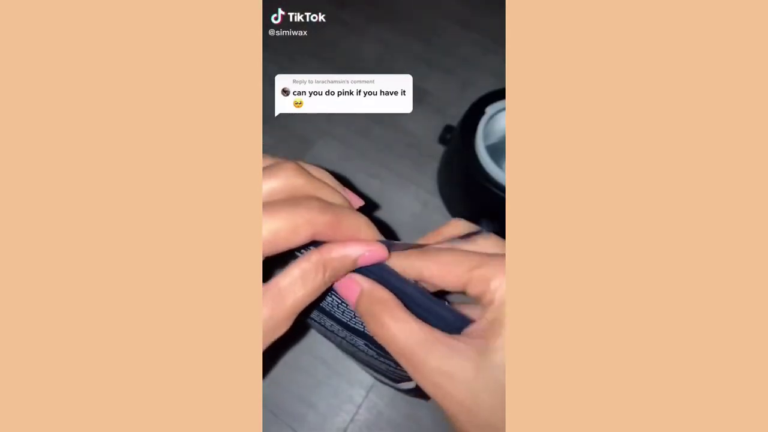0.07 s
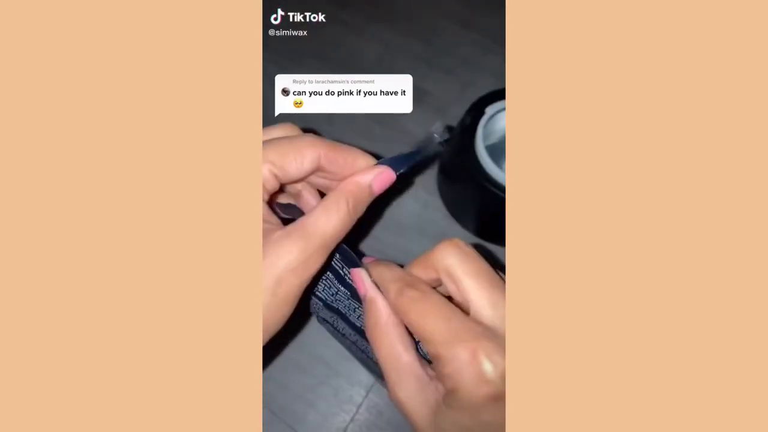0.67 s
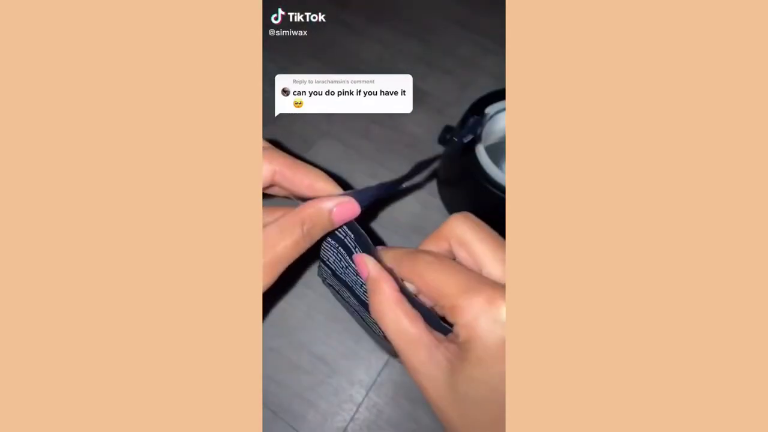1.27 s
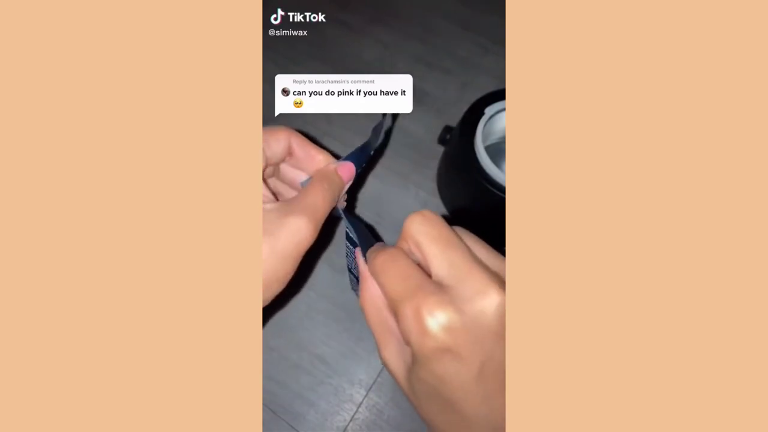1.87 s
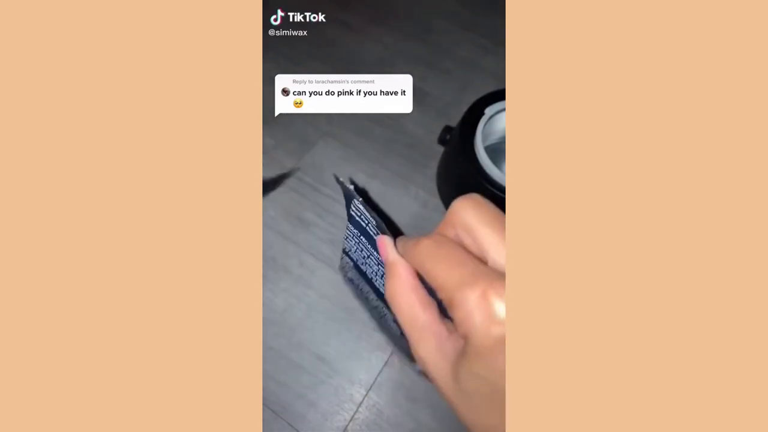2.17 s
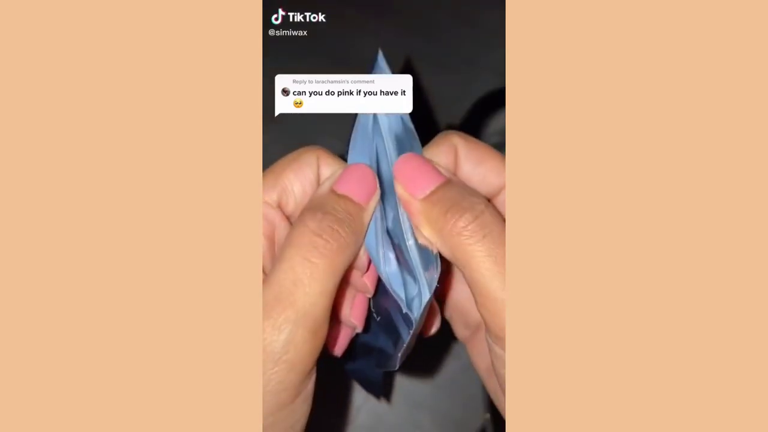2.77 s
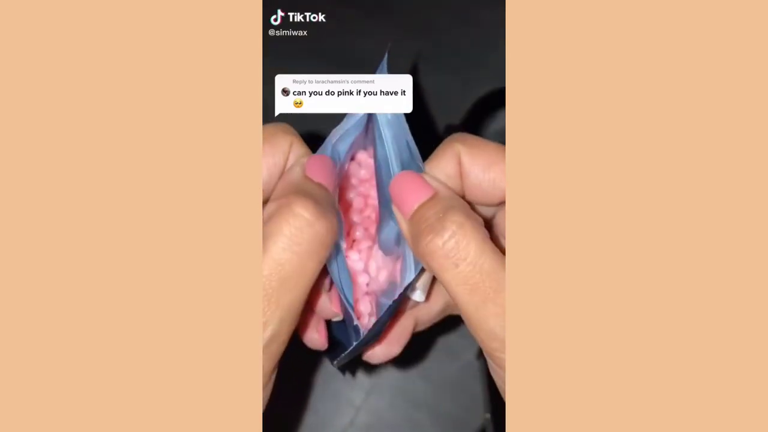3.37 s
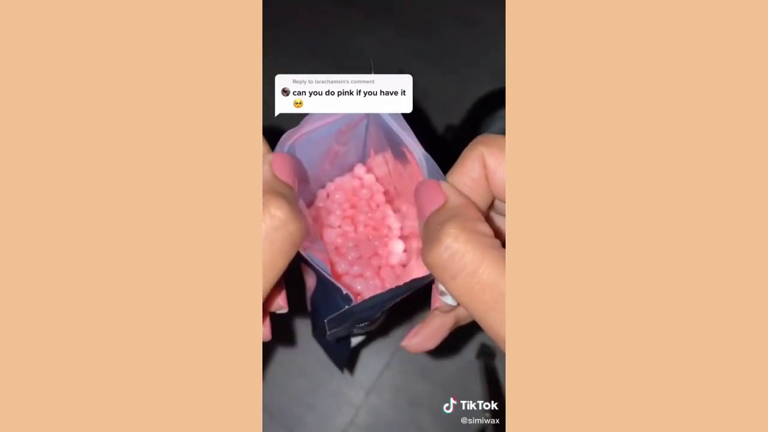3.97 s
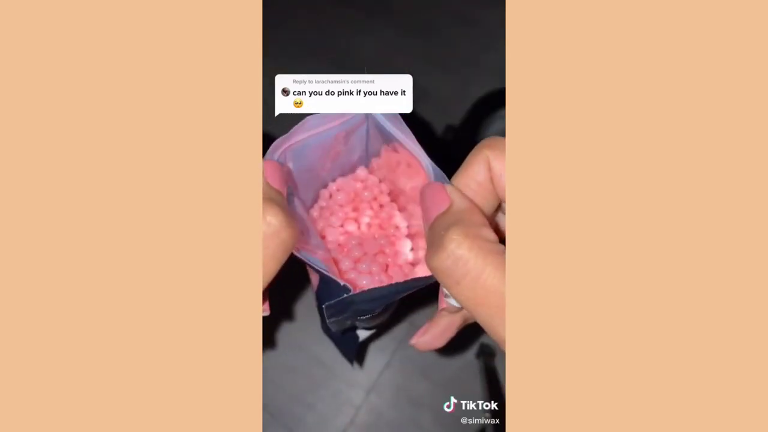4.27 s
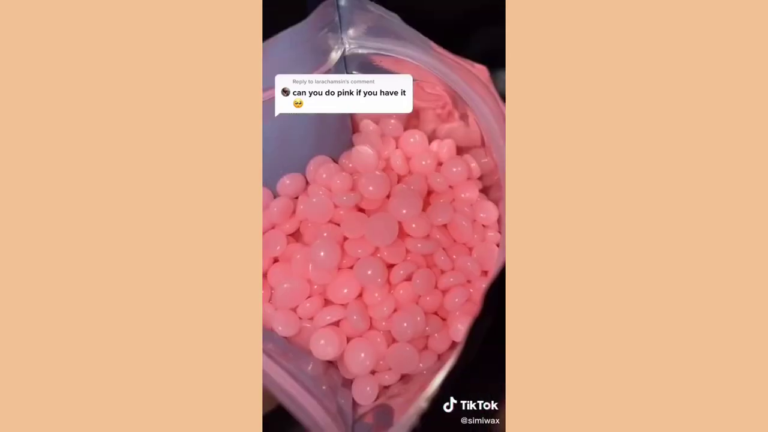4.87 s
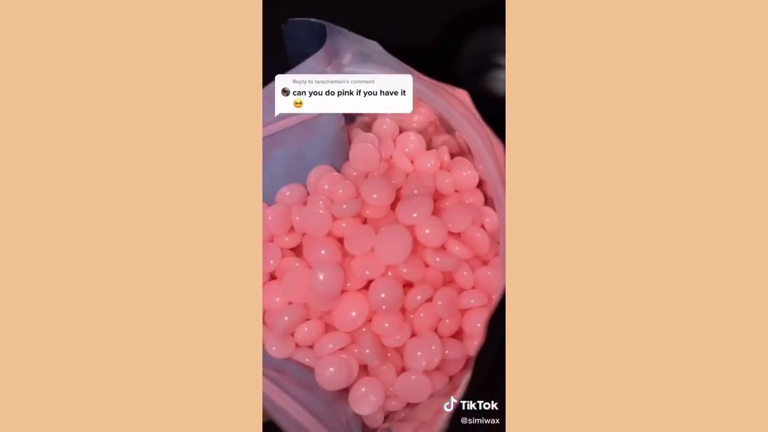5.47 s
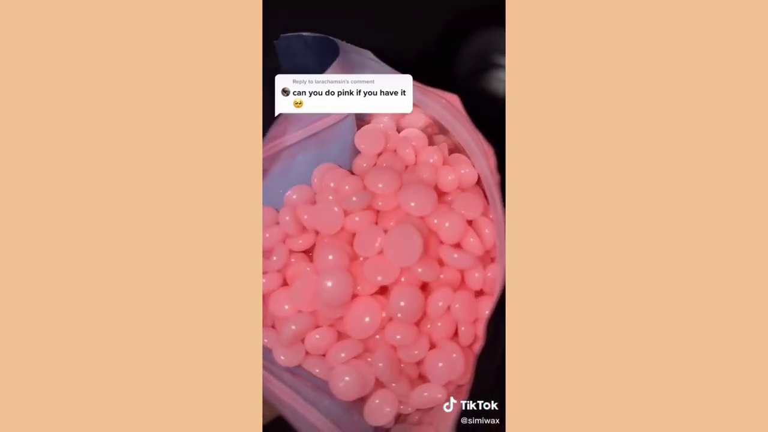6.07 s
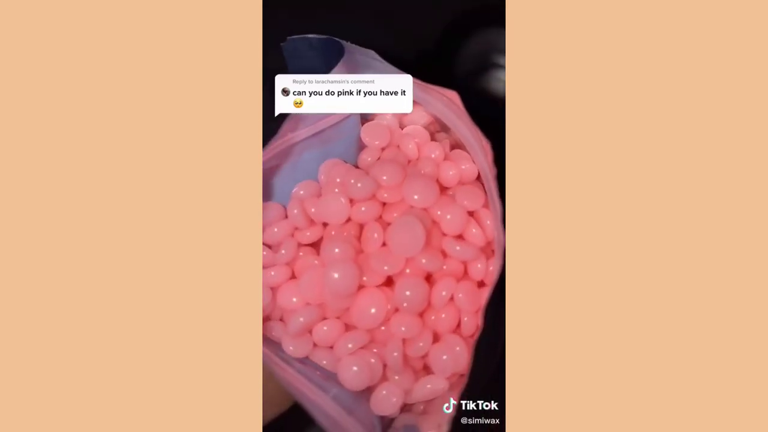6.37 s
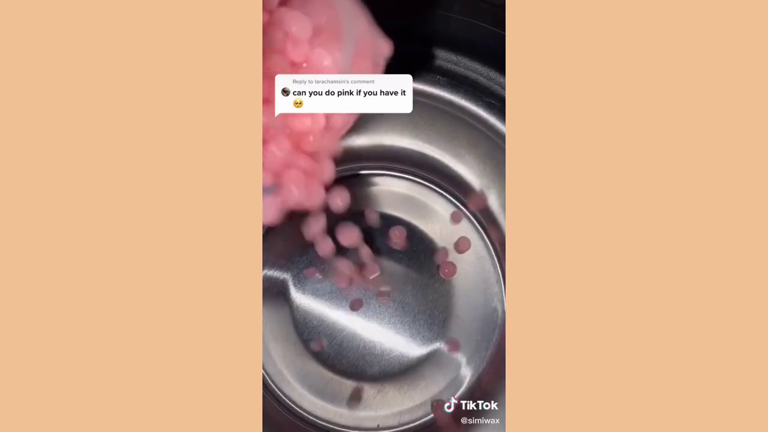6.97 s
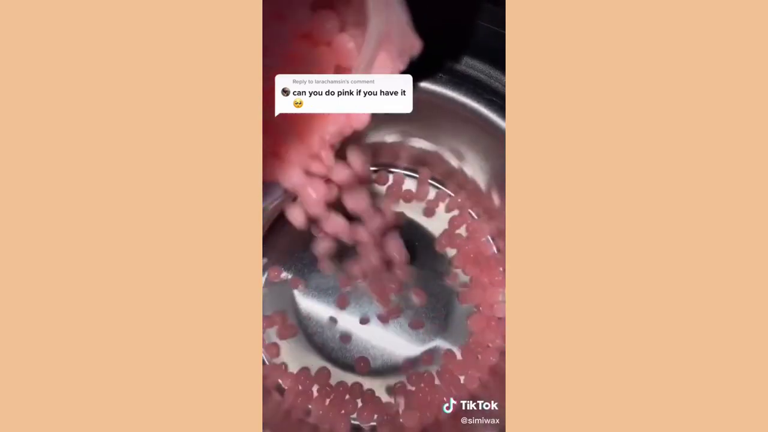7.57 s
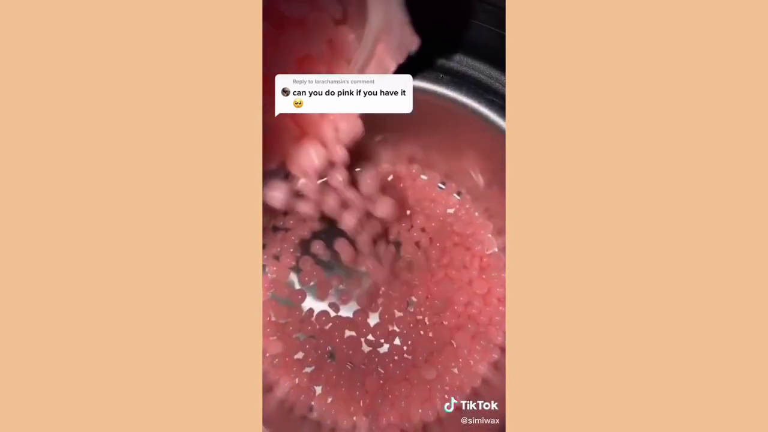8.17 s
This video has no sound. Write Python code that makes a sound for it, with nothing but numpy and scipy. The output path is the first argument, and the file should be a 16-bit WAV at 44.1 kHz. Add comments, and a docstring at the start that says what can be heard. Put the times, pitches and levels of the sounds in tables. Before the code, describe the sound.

Close crackles and snaps of a plastic bag being opened, followed by a bright patter of wax beads landing in a metal pot.

```python
"""Wax beads from pouch to pot

Close up, hands tear the strip off a stiff plastic pouch and pull its mouth open: the film rubs,
buckles and snaps, and the zip pops apart. The wax beads inside slide as the pouch tilts, then pour
into a ringing steel pot, sounding thinner as they cover its bottom.
A small room with a low hum answers every snap."""
import sys
import numpy as np
from scipy import signal
from scipy.fft import rfft, irfft, next_fast_len
from scipy.io import wavfile
from scipy.ndimage import uniform_filter1d

SR = 44100
rng = np.random.default_rng(int(sys.argv[2]) if len(sys.argv) > 2 else 0)


def master_out(mix):
    """Clip the mix to full scale and print it as 16-bit PCM to the path in sys.argv[1]."""
    frames = np.transpose(np.atleast_2d(mix))
    ceiling = np.clip(frames, -1, 1)
    pcm = np.round(ceiling * 32767).astype(np.int16)
    wavfile.write(sys.argv[1], SR, pcm)


N = 362502
TIME = np.arange(N) / SR
BRIEF = TIME[:2048]  # time axis of one short event

# tone of film rubbing on film: freq_hz, gain_db
FILM_TONE = [(100, -2), (700, -4), (4500, -8.5), (10000, -16), (15000, -26.5)]


def amp(db):
    """Decibels to gain."""
    return 10 ** (np.asarray(db) / 20)


def unit_rms(x):
    """Scales to an rms of one."""
    return x / np.sqrt(np.mean(x ** 2) + 1e-20)


def burst(x):
    """Scales a short sound to the energy of 10 ms at an rms of one."""
    return unit_rms(x) * np.sqrt(SR / 100 / x.shape[-1])


def curve_at(points, hz):
    """Reads a curve on a log-frequency axis."""
    freqs, values = np.transpose(points)
    return np.interp(np.log(hz + 1), np.log(freqs + 1), values)


def fader(points):
    """Gain over time from a dB curve; silent before it and from 40 ms after it."""
    s, db = np.transpose(points)
    return amp(np.interp(TIME, s, db)) * (TIME >= s[0]) * (TIME <= s[-1] + .04)


def add(mix, start_s, sound):
    """Mixes a sound into both channels."""
    part = mix[:, max(round(start_s * SR), 0):][:, :sound.shape[1]]
    part += sound[:, :part.shape[1]]


def colour(x, tone, size=2048):
    """Minimum-phase EQ with the given curve and unit power gain."""
    log_gain = np.log(amp(curve_at(tone, abs(np.fft.fftfreq(size, 1 / SR)))))
    taps = np.fft.ifft(np.exp(signal.hilbert(log_gain).conj())).real[:size // 2]
    return signal.oaconvolve(x, taps[None] / np.linalg.norm(taps), axes=1)[:, :x.shape[1]]


def lumps(depth_db, size):
    """A gain that swells and sags at random over about size samples."""
    wander = signal.oaconvolve(rng.standard_normal(N), np.hanning(size), "same")
    return unit_rms(amp(depth_db * unit_rms(wander)))


def puff(decay_s):
    """One contact: stereo noise that starts at once and dies away."""
    return rng.standard_normal((2, len(BRIEF))) * np.exp(-BRIEF / decay_s)


def grains(per_s, spread_db, decay_s, bed):
    """Random contacts of uneven size, each a dying puff, over a bed of finer ones; rms near one."""
    sizes = amp(spread_db * np.minimum(rng.exponential(1, N), 4))
    contacts = sizes * (rng.random(N) < per_s / SR)
    power = signal.lfilter([1], [1, -np.exp(-2 / (decay_s * SR))], contacts ** 2)
    power = power / power.mean() + bed
    power /= uniform_filter1d(power, size=3500)
    return np.sqrt(power) * rng.standard_normal((2, N))


def bend(hz, cycles, glide):
    """A bending wave in the film: the highs arrive first, so the pitch falls through hz."""
    age = BRIEF * hz / cycles
    turns = np.cumsum(hz * (0.65 + glide * np.exp(-age / 2))) / SR
    return burst(age ** 2 * np.exp(-age) * np.sin(2 * np.pi * (turns + rng.random())))


def disperse(x, crossing_s=0.0020814):
    """Wave speed goes as the root of frequency, so clicks chirp down; crossing_s holds at 1 kHz."""
    hz = np.fft.rfftfreq(x.shape[1], 1 / SR)
    turns = crossing_s * (2 * np.sqrt(1000 * hz) - hz * np.sqrt(1000 / hz[-1]))
    return irfft(rfft(x) * np.exp(-2j * np.pi * turns))


def hum(hum_hz=122.2, waver_hz=4):
    """Low room rumble and a wavering hum, both fading under the pour."""
    # tone of the rumble: freq_hz, gain_db
    rumble_tone = [(20, -23.5), (55, 9), (125, 1), (150, -5.5), (290, -17), (1000, -38.5), (1900, -43),
                   (15000, -54)]
    # background fade: time_s, gain_db
    fade = [(6.85, 1.5), (8.2, -23)]
    rumble = unit_rms(colour(rng.standard_normal((2, N)), rumble_tone, size=16384))
    drift = unit_rms(uniform_filter1d(rng.standard_normal(N), size=5000))
    drone = np.sqrt(2) * np.sin(2 * np.pi * np.cumsum(hum_hz + waver_hz * drift) / SR)
    return amp(np.interp(TIME, *np.transpose(fade))) * (amp(-56.5) * rumble + amp(-59) * drone)


def room(x, predelay_s=0.003):
    """The small room's diffuse tail, in which each band dies at its own speed."""
    # reverb time: freq_hz, t60_s
    ring_times = [(300, 0.35), (4000, 0.36), (9000, 0.27), (15000, 0.06)]
    hz, t, bands = signal.stft(rng.standard_normal((2, SR * 3 // 4)), SR, nperseg=256)
    decay = amp(-60 * t / curve_at(ring_times, hz)[:, None])
    tail = signal.istft(bands * decay, SR, nperseg=256)[1]
    tail *= np.clip((np.arange(tail.shape[1]) / SR - predelay_s) / 0.0011, 0, 1)
    tail = signal.sosfilt(signal.butter(1, 700, "high", fs=SR, output="sos"), tail)
    return signal.fftconvolve(x, tail / np.linalg.norm(tail[0]), axes=1)[:, :N]


def flex(band_hz=(45, 170)):
    """Hands flex the whole pouch, and its walls give soft, lumpy pushes of air."""
    # strength of the flexing: time_s, level_db
    flexing = [(2.3, -57.5), (2.6, -52.5), (3.3, -61), (3.9, -42.5), (4.6, -57)]
    band = signal.butter(4, band_hz, "band", fs=SR, output="sos")
    pushes = grains(per_s=12, spread_db=-1.5, decay_s=0.011, bed=0.067)
    return fader(flexing) * unit_rms(signal.sosfilt(band, pushes))


def slide():
    """Beads shift and tick against each other as the pouch tilts."""
    # the shifting mass: time_s, level_db
    shifting = [(5.33, -66.5), (6.1, -71.5), (6.45, -84.5), (6.52, -56.5), (6.76, -50.5)]
    # single beads that stand out: start_s, level_db
    single_ticks = [(5.347, -51), (5.428, -50), (5.443, -52.5), (5.529, -56.5), (5.727, -60),
                    (5.881, -58.5), (5.906, -51.5), (6.183, -59), (6.555, -48.5), (6.674, -52.5)]
    # tone of bead on bead: freq_hz, gain_db
    bead_tone = [(500, -7), (6000, -1.5), (11000, -7), (15000, -2.5)]
    ticks = fader(shifting) * grains(per_s=120, spread_db=3.6, decay_s=.001, bed=.2)
    for start_s, db in single_ticks:
        add(ticks, start_s, amp(db) * burst(puff(decay_s=0.0057)))
    return colour(ticks, bead_tone)


def pulling(hold_db=-67.5, tilt_s=5.4, rise_share=0.34, ends_db=-21):
    """How hard the film rubs: pulls swell and relax over a faint holding rub that ends at the tilt."""
    # fingers pull or shift their grip: peak_s, level_db, length_s
    pulls = [(0.005, -36, 0.13), (0.294, -45, 0.17), (0.575, -42, 0.35), (0.897, -50, 0.16),
             (1.42, -47, 0.42), (1.741, -42.5, 0.12), (2.016, -41, 0.37), (2.518, -32, 0.039),
             (3.29, -52.5, 0.75), (3.743, -48.5, 1), (4.455, -41, 0.089), (4.752, -50, 0.14)]
    power = amp(hold_db) ** 2 * (TIME < tilt_s)
    for peak_s, db, length_s in pulls:
        offset = (TIME - peak_s) / length_s
        from_peak = np.maximum(-offset / rise_share, offset / (1 - rise_share))
        power += amp(db + ends_db * from_peak ** 0.87) ** 2
    return np.sqrt(power)


def rustle(low_hz=400, high_hz=2300, pitches=16, kinks_per_s=260, kink_db=-5):
    """Film rubs on film, and tiny kinks each send off a hollow bending wave."""
    kinks = np.zeros(N)
    for hz in np.geomspace(low_hz, high_hz, pitches):
        sizes = amp(3 * np.minimum(rng.exponential(1, N), 3))
        triggers = sizes * (rng.random(N) < kinks_per_s / pitches / SR)
        kinks += signal.oaconvolve(triggers, bend(hz, cycles=0.72, glide=0.64))[:N] / hz ** 0.25
    friction = lumps(2, size=1300) * grains(per_s=200, spread_db=3.5, decay_s=.0024, bed=.25)
    return pulling() * (colour(friction, FILM_TONE) + amp(kink_db) * unit_rms(kinks))


def hollow_kinks(scrape_db=-6):
    """The clearest kinks pop without a crack: one falling wave and a brief scrape of film."""
    # hollow pops: start_s, level_db, pitch_hz
    kinks = [(0.255, -49, 820), (0.344, -52, 575), (0.448, -47.5, 1180), (0.771, -40.5, 1260),
             (1.23, -49, 583), (1.44, -46.5, 1580), (2.396, -53, 507), (2.939, -44, 1600), (3.89, -34, 350),
             (3.927, -32, 190.1), (4.038, -34.5, 380), (4.089, -36.5, 420), (4.164, -37.5, 400),
             (4.382, -43.5, 1040), (4.441, -37.5, 556), (4.493, -43.5, 903), (4.783, -44, 1630)]
    out = np.zeros((2, N))
    for start_s, db, hz in kinks:
        scrape = burst(colour(puff(decay_s=0.01), FILM_TONE))
        wave = bend(hz, cycles=0.53, glide=1.42)
        add(out, start_s, amp(db) * (wave + amp(scrape_db) * scrape))
    return out


def zip_seal(decay_s=0.002):
    """The zip parts, each pop ringing one short note."""
    # pops of the seal: start_s, level_db, pitch_hz
    pops = [(2.505, -25, 2354), (2.527, -32, 2440)]
    out = np.zeros((2, N))
    for start_s, db, hz in pops:
        note = np.exp(-BRIEF / decay_s) * np.sin(2 * np.pi * hz * BRIEF)
        add(out, start_s, amp(db) * burst(note)[None])
    return out


def buckle_gains(extent, focus_db=31.5):
    """Splits a snap's power: a small buckle mostly cracks, a middling one creases, a large one flaps."""
    distance = extent - np.array([0, .5, 1])
    gains = amp(np.array([0, -5.5, 0]) - focus_db * distance ** 2)
    return gains / np.linalg.norm(gains)


def snaps(crack_rise_s=0.0003, crack_decay_s=0.0022, crease_decay_s=0.006, shiver_decay_s=0.011):
    """The film gives way in splinters with a crack; slower bending waves follow and the wall flaps."""
    # buckles: start_s, level_db, extent (0 a tiny crease, 1 the whole wall), corner_hz (crack roll-off)
    buckles = [(0.037, -25.5, 0.38, 5300), (0.48, -34.5, 0.43, 7500), (0.524, -27.5, 0.19, 8400),
               (0.55, -28.5, 0.025, 7330), (0.58, -30.5, 0.05, 10200), (0.613, -37.5, 0.31, 5500),
               (1.163, -36.5, 0.064, 4600), (1.312, -32.5, 0.32, 4080), (1.365, -35.5, 0.39, 3850),
               (1.511, -34, 0.52, 3800), (1.693, -40, 0.27, 5630), (1.9555, -19, 0.24, 10500),
               (1.9676, -23.5, 0.42, 7500), (1.9792, -26.5, 0.2, 8150), (2.106, -37.5, 0.47, 6500),
               (2.272, -36.5, 0.52, 4500), (2.503, -26, 0.39, 13000), (2.526, -27.5, 0.071, 8000),
               (2.6411, -31.5, 0.27, 5800), (3.0546, -28.5, 0.21, 6430), (3.1512, -32, 0.3, 5860),
               (3.1995, -29.5, 0.045, 6920), (3.5108, -18, 0.15, 9240), (3.5482, -22, 0.55, 11110),
               (3.676, -32.5, 0.073, 5880), (3.735, -16.5, 0.49, 8270), (3.7356, -18, 0.88, 5920),
               (3.7511, -16.5, 0.2, 6930), (3.769, -30, 0.12, 7230), (3.92, -24, 0.38, 10630),
               (3.981, -21.5, 0.25, 10200), (4.2327, -27.5, 0.46, 9050), (4.269, -25.5, 0.51, 2924),
               (4.461, -28, 0.65, 3410), (4.9104, -34.5, 0.65, 3200), (5.018, -15.5, 0.68, 4820),
               (5.201, -22, 0.071, 9650)]
    # tone of a crack: multiple_of_corner, gain_db
    crack_tone = [(0.07, -25.5), (0.28, -2), (0.65, -1.5), (1, -2.5), (1.5, -11), (2.998, -23.5)]
    # tone of a crease: freq_hz, gain_db
    crease_tone = [(200, -3), (650, 1.5), (1200, -1), (2100, -2.5), (4500, -21.5)]
    # the wall flaps lower while it is slack: time_s, pitch_hz
    wall_pitch = [(3.1, 400), (3.55, 164), (3.78, 147), (4.05, 299), (4.46, 200), (4.9, 433)]
    shiver = amp(-25) * np.exp(-BRIEF / shiver_decay_s)
    crack_shape = (1 - np.exp(-BRIEF / crack_rise_s)) * (np.exp(-BRIEF / crack_decay_s) + shiver)
    crease_shape = np.exp(-BRIEF / crease_decay_s) + shiver
    click = burst(signal.unit_impulse(len(BRIEF))[None])
    roughness = lumps(4, size=60)
    out = np.zeros((2, N))
    for start_s, db, extent, corner_hz in buckles:
        noise = rng.standard_normal((2, 2, len(BRIEF)))
        crack_noise, crease_noise = noise * roughness[rng.integers(N - len(BRIEF)):][:len(BRIEF)]
        splinters = burst(crack_noise * crack_shape) + amp(-3) * disperse(click)
        crack = burst(colour(splinters, np.array(crack_tone) * [corner_hz, 1]))
        wrinkles = click + amp(-4) * burst(crease_noise * crease_shape)
        chirp = burst(disperse(colour(wrinkles, crease_tone)))
        wave_hz = 3020 / 2 ** (1.51 * extent)  # larger buckles sound lower
        crease = burst(chirp + amp(-7) * bend(wave_hz, cycles=0.25, glide=2.57))
        flap = bend(np.interp(start_s, *np.transpose(wall_pitch)), cycles=0.36, glide=1.767)
        crack_gain, crease_gain, flap_gain = amp(db) * buckle_gains(extent)
        add(out, start_s, crack_gain * crack + crease_gain * crease + flap_gain * flap)
    return out


def pot_ring(clicks):
    """The steel's resonances ring on top of each click, more or less by the spot that is struck."""
    # resonances of the pot: pitch_hz, width_hz, gain_db (against the plain click)
    modes = [(1440, 150, 2.5), (2220, 59, 4.5), (2425, 250, -3.5), (2935, 190, -2.5), (4020, 300, -3.5),
             (5520, 240, 4), (9350, 360, -3.5)]
    out = clicks.copy()
    for hz, width_hz, db in modes:
        spot = lumps(4, size=1200)
        out += amp(db) * signal.lfilter(*signal.iirpeak(hz, hz / width_hz, SR), spot * clicks)
    return out


def drumming(start_s=6.793, rise_s=0.035, level_db=-35.5, fade_db_per_s=15.5):
    """How hard the pot's bottom drums: a quick rise, then a steady fade under the growing pile."""
    age = np.maximum(TIME - start_s, 0)
    return np.minimum(age / rise_s, 1) * amp(level_db - fade_db_per_s * age)


def pour(clack_db=-5.5, knock_db=3, pile_start_s=6.85, cover_time_s=0.78):
    """Beads land in clumps and bounce; the pot's bottom sounds thinner as they pile up on it."""
    # flow of beads into the pot: time_s, level_db
    flow = [(6.8, -44.5), (6.94, -29.5), (7.11, -30.5), (7.22, -19.5), (7.285, -33.5), (7.44, -30.5),
            (7.5, -28), (7.88, -23.5), (7.94, -28.5), (8.2, -30.5)]
    # clumps that strike the steel hardest: start_s, strength_db
    clumps = [(6.902, -24), (6.936, -10.5), (6.952, -14), (6.976, -15), (7.009, -18.5), (7.032, -14.5),
              (7.0809, -11), (7.088, -17.5), (7.108, -37), (7.129, -10), (7.14, -17), (7.174, -15),
              (7.198, -12.5), (7.257, -13.5), (7.268, -16), (7.312, -17), (7.332, -15.5), (7.367, -17.5),
              (7.419, -19.5), (7.463, -17), (7.482, -13.5), (7.505, -23), (7.552, -13.5), (7.592, -21.5),
              (7.673, -16), (7.712, -15), (7.761, -17), (7.959, -28), (7.984, -16.5), (8.1, -28),
              (8.128, -21.5)]
    # tone of the bright patter: freq_hz, gain_db
    patter_tone = [(200, -26.5), (900, -22), (1900, -21.5), (2600, -12), (3400, -16), (7000, -9),
                   (14500, -2.5)]
    # tone of the bare bottom: freq_hz, gain_db
    drum_tone = [(45, -17), (150, 2.5), (300, -1), (1000, -5), (5000, -12), (15000, -16.5)]
    stream = fader(flow) * lumps(1.8, size=700)
    landings = stream * grains(per_s=330, spread_db=2.4, decay_s=.0012, bed=.06)
    knocks = grains(per_s=130, spread_db=2.2, decay_s=.002, bed=.08)
    for start_s, db in clumps:
        clump = burst(puff(decay_s=0.0036))
        add(landings, start_s, amp(db + clack_db) * clump)
        add(knocks, start_s, amp(knock_db) * clump)
    drum = colour(drumming() * knocks, drum_tone)
    # the weight of the pile damps the lowest notes first
    covered = np.clip((TIME - pile_start_s) / cover_time_s, 0, 1)
    thin = signal.sosfilt(signal.butter(2, 850, "high", fs=SR, output="sos"), drum)
    return pot_ring(colour(landings, patter_tone) + (1 - covered) ** 2 * drum + covered * thin)


def scene():
    """The pouch and the pot, close by, in the humming room."""
    pouch = snaps() + hollow_kinks() + rustle() + slide()
    beads = pour()
    room_send = amp(-17) * pouch + amp(-7.5) * beads
    return pouch + zip_seal() + flex() + beads + room(room_send) + hum()


def record(dry, ring_hz=14400, ring_width_hz=1500, ring_db=6.5, cutoff_hz=15800):
    """Two ringing mic ports hear the bass alike, the treble out of phase; then clipping and a low-pass."""
    # stereo image of the ports: freq_hz, likeness (0 to 1), left_lead_rad
    port_image = [(1640, 0.79, 0.11), (2400, 0.6, 0.23), (3000, 0.9, 1.7), (4090, 0.79, 1.1),
                  (4880, 0.2, 3.4), (5420, 0.7, 6.74), (9370, 0.96, 8.32), (14800, 0.98, 9.5)]
    port_hz, likeness, lead_rad = np.transpose(port_image)
    size = next_fast_len(N + 4096)
    hz = np.fft.rfftfreq(size, 1 / SR)
    port_ring = amp(ring_db * np.exp(-((hz - ring_hz) / ring_width_hz) ** 2))
    left, other = rfft(dry, size) * port_ring
    alike = curve_at(np.c_[port_hz, likeness], hz)
    apart = np.sqrt(1 - alike ** 2) * np.clip(hz / 450, .4, 1)
    lead = curve_at(np.c_[port_hz, lead_rad], hz) * np.minimum(hz / port_hz[0], 1)
    right = (np.sqrt(1 - apart ** 2) * left + apart * 1j * other) * np.exp(-1j * lead)
    clipped = np.clip(irfft(np.array([left, right]), size)[:, :N], -1, 1)
    lowpass = signal.firwin(301, cutoff_hz, window=("kaiser", 8), fs=SR)
    return signal.oaconvolve(clipped, lowpass[None], "same", axes=1)


dry = scene()
out = record(dry)
master_out(out)
```